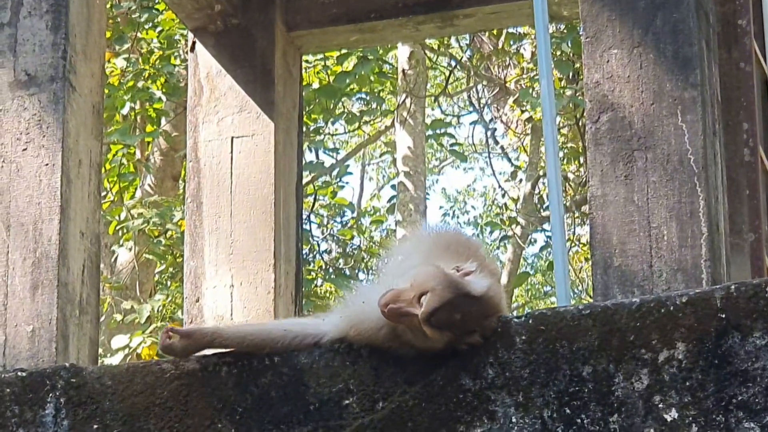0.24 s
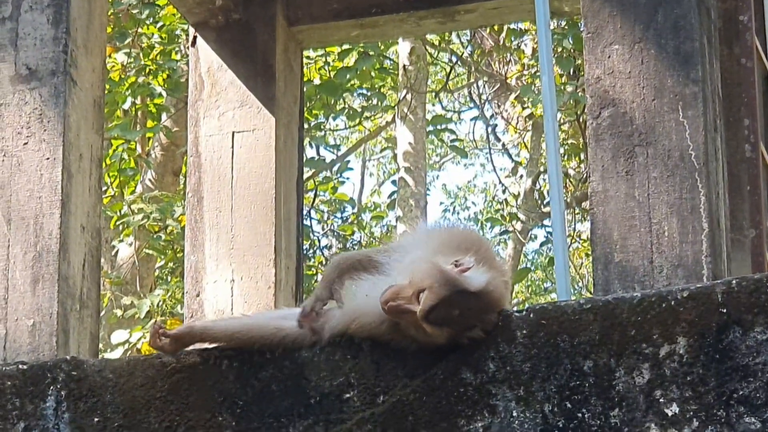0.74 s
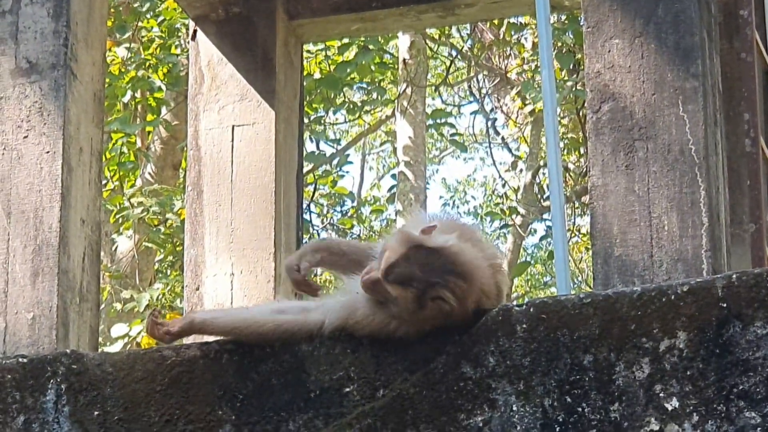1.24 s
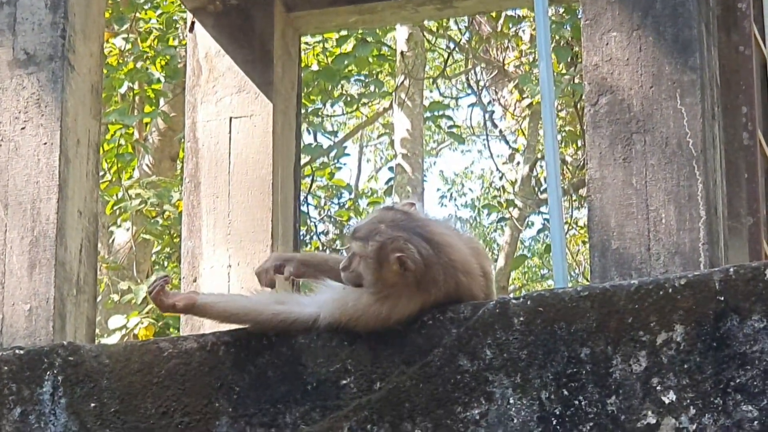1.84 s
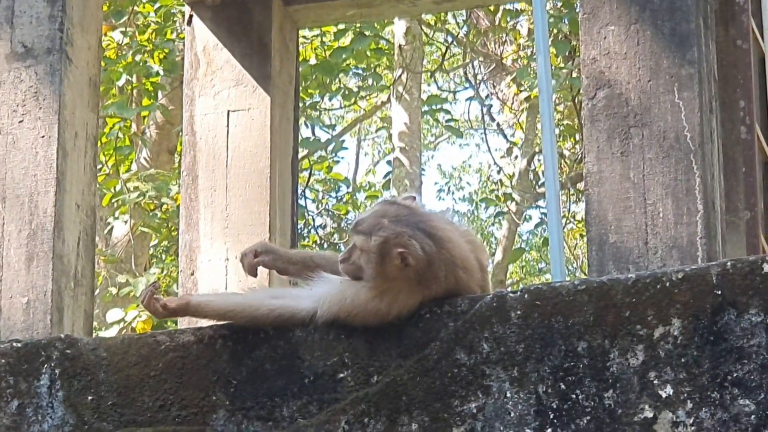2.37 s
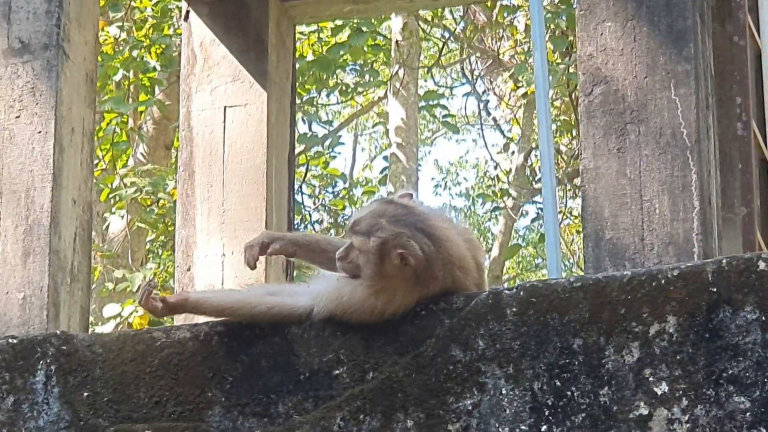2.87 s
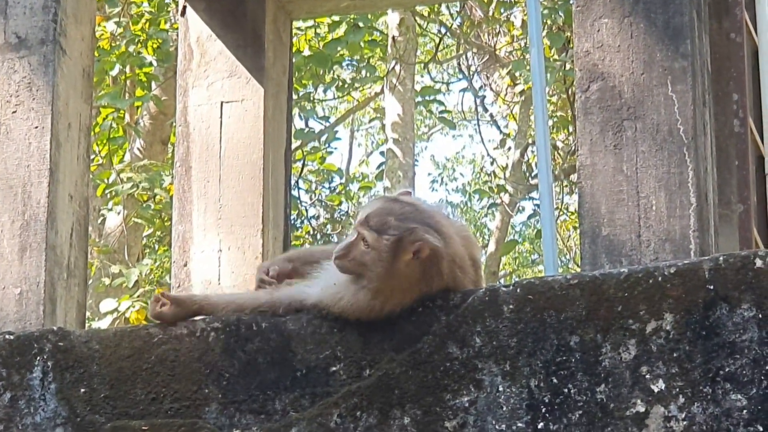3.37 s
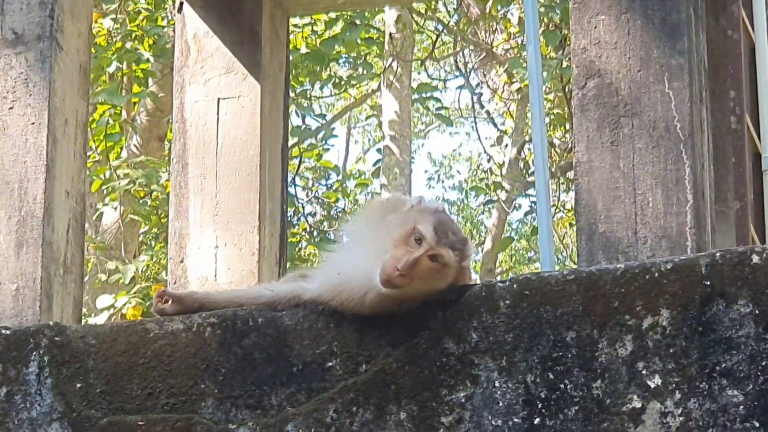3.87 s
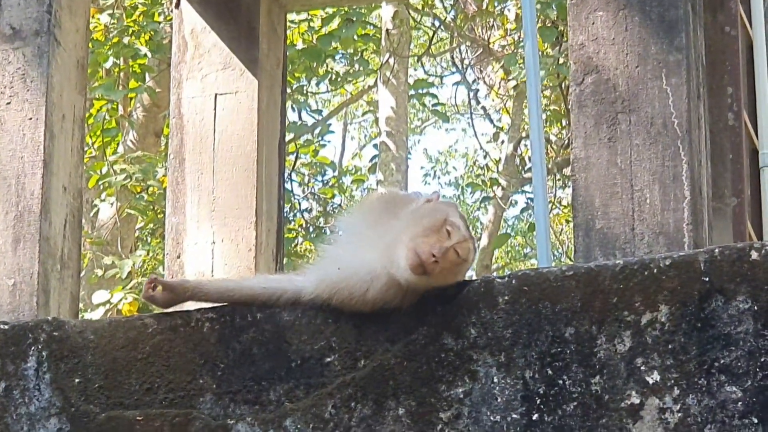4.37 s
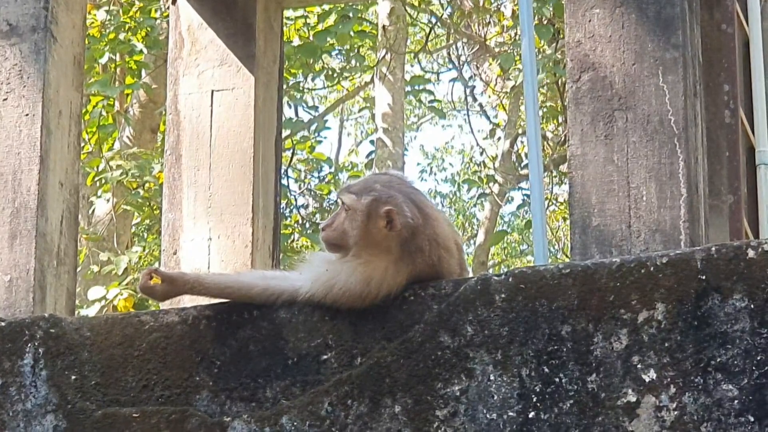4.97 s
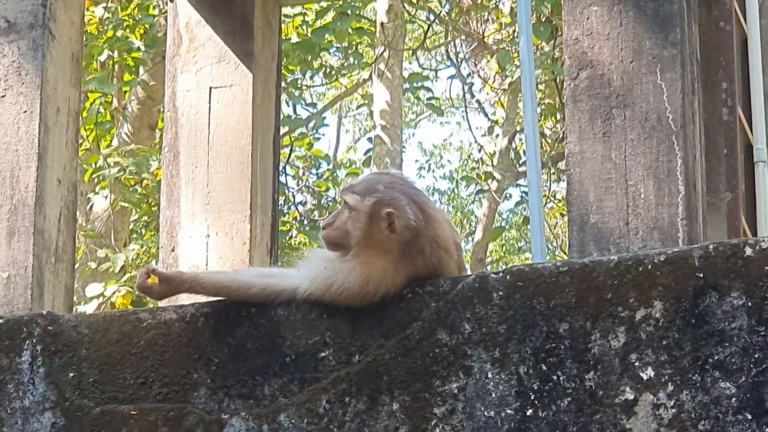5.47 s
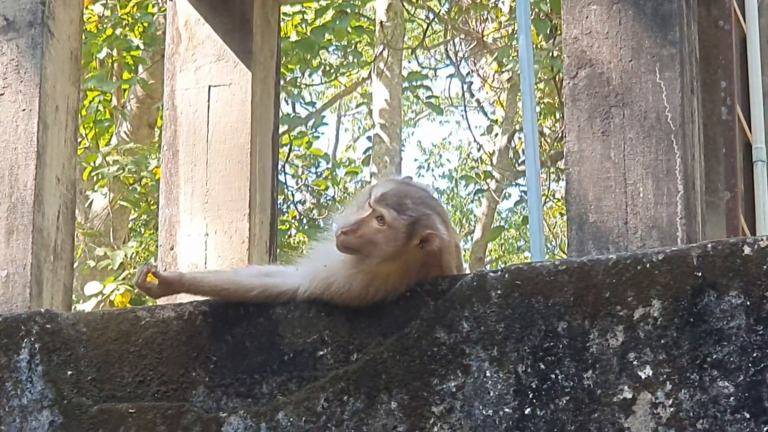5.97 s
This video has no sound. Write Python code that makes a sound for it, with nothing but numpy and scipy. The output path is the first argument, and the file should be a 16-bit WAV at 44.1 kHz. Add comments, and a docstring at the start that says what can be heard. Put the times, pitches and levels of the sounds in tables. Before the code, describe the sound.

One bird repeats a sharp falling chip while others whistle and call among echoing trees, above a low far-off rumble.

```python
"""Birds around a forest shelter

Small birds call from the trees over a low, far-off rumble and a faint hiss of insects.
One repeats a falling chip, broken up by reflections off the open shelter's posts and beams;
others whistle, slur, twitter, hoot and give nasal notes, mostly as gliding, trembling tones.
Trunks and leaves scatter the calls into a long tail."""
import sys
import numpy as np
from scipy import signal
from scipy.fft import rfft, irfft
from scipy.io import wavfile
from scipy.ndimage import uniform_filter1d

SR = 44100
rng = np.random.default_rng(int(sys.argv[2]) if len(sys.argv) > 2 else 0)


def pcm_store(signal):
    """Save signal as 16-bit PCM."""
    levels = np.round(np.clip(np.atleast_2d(signal), -1, 1) * 32767)
    wavfile.write(sys.argv[1], SR, levels.astype(np.int16).T)


N = 273861
TIME = np.arange(N) / SR


def amp(db):
    """Decibels to gain."""
    return 10 ** (np.asarray(db) / 20)


def unit(x):
    """Scales to an rms of one."""
    return x / np.sqrt(np.mean(x ** 2) + 1e-20)


def read(points, hz):
    """A table's value at hz, on a log-frequency axis."""
    freq_hz, value = np.transpose(points)
    return np.interp(np.log(hz + 1), np.log(freq_hz), value)


def add(mix, start_s, sound):
    """Mixes a sound in at start_s."""
    part = mix[..., max(round(start_s * SR), 0):][..., :sound.shape[-1]]
    part += sound[..., :part.shape[-1]]


def wander(rate_hz):
    """A smooth random curve of unit size."""
    hz = np.fft.rfftfreq(N, 1 / SR)
    return unit(irfft(rfft(rng.standard_normal(N)) * np.exp(-(hz / rate_hz) ** 2), N))


# Stereo width of the noise beds: freq_hz, left_right_correlation
BED_WIDTH = [(60, 0.98), (130, 0.95), (300, 0.79), (600, 0.43), (1200, 0), (2600, 0.29), (5000, 0),
             (15000, 0.042)]
# Their lean to one side: freq_hz, left_minus_right_db
BED_BALANCE = [(60, 0), (110, -2), (200, 0.5), (380, -2), (700, -1), (1290, -2.0), (2380, -3), (4400, 2.5),
               (8120, 2.5), (15000, 1.5)]

def noise(shape, patchy_db):
    """Diffuse stereo noise with the spectrum shape(hz), drifting in patches; the bass is near mono."""
    hz = np.fft.rfftfreq(4096, 1 / SR)
    a, b, c, d, patches = rng.standard_normal((5, len(hz), N // 1024 + 3))
    patches = unit(uniform_filter1d(uniform_filter1d(patches, size=30, axis=0), size=5, axis=1))
    alike = np.clip(read(BED_WIDTH, hz), -1, 1)[:, None]
    left = a + 1j * b
    right = alike * left + np.sqrt(1 - alike ** 2) * (c + 1j * d)
    spectra = np.array([left, right]) * shape(hz)[:, None] * amp(patchy_db * patches)
    spectra *= amp(np.outer([.5, -.5], read(BED_BALANCE, hz)))[:, :, None]
    return unit(signal.istft(spectra, nperseg=4096, noverlap=3072)[1][:, :N])


def band(centre_hz, width_hz):
    """A bell-shaped spectrum."""
    return lambda hz: np.exp(-((hz - centre_hz) / width_hz) ** 2)


# Tone of the low roar: freq_hz, gain_db
ROAR_EQ = [(18, -34), (29, -47), (42, 0), (58, 0.5), (68, -6), (88, 1.5), (102, -7.5), (130, -10),
           (160, -17), (230, -21.5), (400, -23.5), (650, -26), (1100, -33), (1800, -42)]
# Swells on top of the steady drone: peak_s, half_width_s, level_db
SWELLS = [(.72, 0.41, -45), (1.29, 0.16, -34.5), (2.1, 0.16, -38.5), (3.59, 0.031, -36.5),
          (4.32, 0.029, -42), (6.14, 0.048, -42)]

def rumble(roar_db=-39, drone_db=-48.5, drone_hz=78, drift_hz=3):
    """Low roar, perhaps of distant traffic, with one wavering engine-like drone."""
    roar = noise(lambda hz: amp(read(ROAR_EQ, hz)) / (1 + (hz / 2200) ** 4), patchy_db=1.5)
    drone = np.sqrt(2) * np.sin(2 * np.pi * np.cumsum(drone_hz + drift_hz * wander(7.64)) / SR)
    swells = sum(amp(db) * np.exp(-((TIME - s) / width) ** 2) for s, width, db in SWELLS)
    return amp(roar_db) * roar + (amp(drone_db) + swells) * drone


# Tone of the forest bed: freq_hz, gain_db
AIR_EQ = [(590, -47), (1000, -7.5), (1150, -0.5), (1250, -4.5), (1680, -4), (2020, -2), (2640, -5),
          (2730, -5.5), (2860, -8), (3070, -6.5), (4190, -13.5), (5040, -13.5), (6490, -10), (9840, -32),
          (15800, -23)]

def forest_air(level_db=-53.7):
    """The soft hiss of the far forest."""
    return amp(level_db) * noise(lambda hz: amp(read(AIR_EQ, hz)), patchy_db=2.22)


# Bouts of insect hiss: start_s, length_s, level_db
INSECT_CUES = [(1.33, 2.08, -60.5), (3.975, 2.02, -59)]

def insects():
    """Insects hiss in a high, patchy band that fades in and out."""
    bouts = np.zeros(N)
    for s, length, db in INSECT_CUES:
        add(bouts, s, amp(db) * signal.windows.tukey(int(length * SR), .5))
    return bouts * noise(band(centre_hz=5700, width_hz=1800), patchy_db=5.5)


# Soft rustles and thin hisses: start_s, length_s, level_db, centre_hz, width_hz
RUSTLE_CUES = [(0, 0.087, -50.5, 2550, 1290), (2.08, 0.67, -52, 323, 200), (4.248, 0.86, -56.5, 274, 180),
               (4.45, 0.083, -53, 6100, 1600), (5.045, 0.22, -66.5, 10900, 1400)]

def rustles():
    """Bands of noise that each swell once and die away."""
    out = np.zeros((2, N))
    for s, length, db, centre_hz, width_hz in RUSTLE_CUES:
        swell = np.zeros(N)
        add(swell, s, np.sin(np.linspace(0, np.pi, int(length * SR))))
        out += amp(db) * swell * noise(band(centre_hz, width_hz), patchy_db=0)
    return out


def forest_echo(x, t60_s, early_t60_s=0.15, early_db=4, rise_s=0.015):
    """Early echoes off near trunks, then a long, smooth scatter from the trees."""
    t = np.arange(2 * SR) / SR
    taps = rng.choice([-1., 1.], (2, len(t))) * (rng.random((2, len(t))) < .05)
    decay = amp(-60 * t / t60_s) + amp(early_db - 60 * t / early_t60_s)
    tail = taps * decay * (1 - np.exp(-t / rise_s))
    tail /= np.linalg.norm(tail, axis=1, keepdims=True)
    return signal.fftconvolve(x[None], tail, axes=1)[:, :N]


def shelter(x, count=22, reach_s=.024, reflections_db=1):
    """Posts, beams and floor add a handful of reflections that break up a sweep."""
    taps = np.zeros((2, int(reach_s * SR) + 1))
    for ear, (lateness, sign) in zip(taps, rng.random((2, 2, count))):
        delay_s = (.1 + .9 * lateness) * reach_s
        ear[(delay_s * SR).astype(int)] = np.sign(sign - .5) * np.exp(-lateness)
    taps *= amp(reflections_db) / np.linalg.norm(taps[0])
    taps[:, 0] = 1  # the direct path
    return signal.fftconvolve(x, taps / np.linalg.norm(taps[0]), axes=1)


def leaves(x, edge_hz=8800):
    """Foliage and air soak up the highest overtones."""
    hz = np.fft.rfftfreq(2 * N, 1 / SR)
    return irfft(rfft(x, 2 * N) / (1 + (hz / edge_hz) ** 10))[:, :N]


def place(x, side, lag_s=0.00012, shade_db=4):
    """A source reaches the nearer ear earlier and louder (side: +1 left, -1 right)."""
    ear = np.array([[.5], [-.5]]) * side
    lead = np.exp(2j * np.pi * np.fft.rfftfreq(len(x), 1 / SR) * lag_s * ear)
    return irfft(rfft(x) * lead, len(x)) * amp(shade_db * ear)


def hoots(start_s=.52, every_s=0.11, length_s=0.078, pitch_hz=1060, peak_db=-57, count=6):
    """A very distant bird gives an even run of soft hoots."""
    out, t = np.zeros(N), np.arange(int(length_s * SR)) / SR
    hoot = amp(peak_db) * np.sin(2 * np.pi * pitch_hz * t) * np.hanning(len(t))
    for k in range(count):
        add(out, start_s + k * every_s, hoot)
    return out


def note(length_s, pitches_hz, rough, tremor, waver=0.0777, flutter=0.091):
    """Phase and envelope of one note: the pitch curves through three points and trembles."""
    progress = np.linspace(0, 1, int(length_s * SR))
    n = len(progress)
    contour_hz = np.polyval(np.polyfit([0, .5, 1], pitches_hz, 2), progress)
    hz = contour_hz * (1 + waver * rough * tremor[:n])
    swell = signal.windows.tukey(n, .5) * np.exp(flutter * rough * tremor[::-1][:n])
    return 2 * np.pi * np.cumsum(hz) / SR, np.sqrt(2) * swell


# Nasal calls: start_s, length_s, level_db, first_hz, middle_hz, last_hz
NASAL_CUES = [(2.055, 0.11, -62.5, 1867, 1904, 1880), (2.476, 0.097, -51.5, 1860, 1880, 1924),
              (2.65, 0.16, -54.5, 1807, 1887, 1930), (3.83, .1, -57, 1700, 1730, 1740),
              (3.91, .135, -50, 1735, 1745, 1748), (4.359, 0.075, -58.5, 1640, 1660, 1640),
              (4.581, 0.077, -53.5, 1720, 1680, 1580)]
# Their timbre: harmonic_number, gain_db
NASAL_HARMONICS = [(1, 1.5), (2, -5), (3, -11), (4, -16)]

def nasals(rough=0.13):
    """A bird gives short, nearly level notes with a stack of overtones."""
    out, tremor = np.zeros(N), wander(250)
    for s, length, db, *pitches in NASAL_CUES:
        phase, swell = note(length, pitches, rough, np.roll(tremor, -int(s * SR)))
        voice = sum(amp(gain_db) * np.sin(k * phase) for k, gain_db in NASAL_HARMONICS)
        add(out, s, amp(db) * swell * voice)
    return out


def overtones(phase, step_db, count=3):
    """The octave and the harmonics above it, each weaker than the last."""
    return sum(amp(k * step_db) * np.sin((k + 2) * phase) for k in range(count))


def notes(rows):
    """A run of near-pure notes, each a trembling sine with two weaker overtones."""
    out, tremor = np.zeros(N), wander(328)
    for s, length, db, pitches, rough, octave_db in rows:
        phase, swell = note(length, pitches, rough, np.roll(tremor, -int(s * SR)))
        voice = np.sin(phase) + amp(octave_db) * overtones(phase, step_db=-5, count=2)
        add(out, s, amp(db) * swell * voice)
    return out


def arch(hz, glide_hz, droop=0.0125):
    """First, middle and last pitch of a glide whose ends sag slightly."""
    return [hz * (1 - droop) - glide_hz / 2, hz, hz * (1 - droop) + glide_hz / 2]


# Soft pips: start_s, length_s, level_db, pitch_hz
PIP_CUES = [(0, 0.17, -58.5, 3650), (.222, .39, -57, 2835), (2.132, 0.04, -45.5, 2560),
            (2.562, 0.089, -43, 2605), (3.584, 0.066, -51.5, 3350), (4.134, 0.17, -56, 2330)]

def pips(rough=0.22, octave_db=-22):
    """A bird pips softly, each note on a nearly level pitch."""
    return notes((s, length, db, arch(hz, 0), rough, octave_db) for s, length, db, hz in PIP_CUES)


# Thin high tones: start_s, length_s, level_db, pitch_hz, glide_hz, roughness
HIGH_TONE_CUES = [(1.349, .14, -54.5, 6070, 696, 1.18), (1.648, 0.13, -52.5, 6090, -720, .5),
                  (2.055, 0.095, -51, 5800, 44, 0.29), (2.155, 0.095, -51.5, 5520, -48, 0.04),
                  (2.367, 0.079, -48, 6380, 202, 0.23), (2.493, 0.082, -51, 5740, 300, 0.16),
                  (2.56, 0.1, -55, 5110, 190, 0.28), (4.583, 0.071, -53.5, 5020, -100, .15),
                  (5.379, 0.082, -50, 5640, 1105, 0.33), (5.438, .07, -47.5, 5930, 94, .12)]

def high_tones(octave_db=-32):
    """Thin high tones: twitters, and the bright upper overtones of the nasal calls."""
    return notes((s, length, db, arch(hz, glide), rough, octave_db)
                 for s, length, db, hz, glide, rough in HIGH_TONE_CUES)


# Upward slurs: start_s, level_db
UPSLUR_CUES = [(2.701, -34.5), (4.036, -44), (5.418, -36)]

def upslurs(length_s=.085, pitches_hz=(2532, 3018, 3354), rough=0.44, octave_db=-22):
    """A bird sweeps quickly upward; a fast tremble makes it hoarse."""
    return notes((s, length_s, db, pitches_hz, rough, octave_db) for s, db in UPSLUR_CUES)


# Descending song: start_s, length_s, level_db, pitch_hz, glide_hz, roughness, octave_db
PHRASE_CUES = [(5.043, 0.09, -54, 3076, -84, .08, -23), (5.13, 0.07, -33, 2911, -85, 0.07, -48),
               (5.212, .108, -38.5, 2510, -390, 0.47, -50), (5.408, .15, -45.5, 2114, -2, 0.18, -9),
               (5.608, 0.1124, -42, 2056, -130, 0.09, -15.5), (5.73, 0.14, -58, 1983, 5, 0.27, -28)]

def phrase():
    """A bird steps down through a phrase of separate notes."""
    return notes((s, length, db, arch(hz, glide), rough, octave_db)
                 for s, length, db, hz, glide, rough, octave_db in PHRASE_CUES)


def slide(curve, step_db, rough, waver=.0737, flutter=0.22, edge_s=0.0088):
    """One long whistle that follows its pitch and level curves, trembling a little."""
    when, pitch, db, octave_db = np.transpose(curve)
    hz = np.interp(TIME, when, pitch) * (1 + waver * rough * wander(298))
    phase = 2 * np.pi * np.cumsum(hz) / SR
    gate = np.clip(np.minimum(TIME - when[0], when[-1] - TIME) / edge_s, 0, 1)
    tremble = np.exp(flutter * rough * wander(300))
    tone = amp(np.interp(TIME, when, db)) * np.sin(phase)
    upper = amp(np.interp(TIME, when, octave_db)) * overtones(phase, step_db)
    return np.sqrt(2) * gate * tremble * (tone + upper)


# Path of the rising whistle: time_s, pitch_hz, level_db, octave_level_db
RISE_CURVE = [(.44, 2380, -52, -58), (.57, 2420, -47.5, -50.5), (.62, 2647, -44.5, -61),
              (.685, 2857, -41, -53), (.765, 2853, -39, -64), (.8, 2920, -50, -73), (1.03, 2880, -47, -78)]

def rising_whistle():
    """A bird slides up in one clean whistle and holds the top."""
    return slide(RISE_CURVE, step_db=-8.5, rough=0.075)


# Path of the falling whistle: time_s, pitch_hz, level_db, octave_level_db
FALL_CURVE = [(3.95, 4860, -55.5, -88), (4.2, 4600, -49, -76), (4.25, 4160, -48.5, -62),
              (4.35, 4060, -37.5, -64), (4.41, 3510, -49, -73), (4.465, 3043, -34, -69),
              (4.55, 2874, -33.5, -62), (4.6, 2960, -45.5, -86), (4.71, 2910, -42.5, -90)]

def falling_whistle():
    """A bird slides down in one slightly rough whistle."""
    return slide(FALL_CURVE, step_db=-10, rough=.24)


def whistlers():
    """Six layers of birdsong: returns their direct sound, dimmed by leaves, and a mono echo send."""
    direct, send = np.zeros((2, N)), np.zeros(N)
    for layer, direct_db, side in [(rising_whistle, -6, .49), (falling_whistle, -7, .47),
                                   (phrase, -1, -.36), (upslurs, -8, .74),
                                   (pips, -4, .1), (high_tones, -3, .26)]:
        song = layer()
        direct += amp(direct_db) * place(song, side)
        send += song
    return direct, send


# The lead bird's chips: mid_fall_s, level_db, first_hz, last_hz, high_start_gain_db
CHIP_CUES = [(0.365, -32, 4800, 2060, -10), (.975, -35, 4300, 2304, -1), (1.567, -34.5, 5200, 2240, -1),
             (2.2, -34.5, 3785, 1920, -1.5), (2.746, -32, 3290, 2300, -11), (3.284, -34.5, 3917, 2220, 2),
             (3.837, -34.5, 4200, 2030, -3), (4.354, -34.5, 3380, 1970, 7), (4.865, -31, 4316, 2235, -7)]
# Strength of its voice along the sweep: pitch_hz, gain_db
CHIP_EQ = [(1950, -16), (2300, -9.5), (2550, -7), (2780, -1), (2980, -3.5), (3200, -10), (3600, -9.5),
           (4200, -15), (5200, -14.5)]

def chips(mid_hz=2770, floor_hz=1866, fall_s=.027, hold_s=.0086, side=-.39, flutter=.42, waver=.0256):
    """A trembling tone holds, drops fast and levels out; returns the near sound and an echo send."""
    near, send = np.zeros((2, N)), np.zeros(N)
    t = np.arange(-.06, .08, 1 / SR)  # zero where the fall passes mid_hz
    fall_hz = floor_hz + (mid_hz - floor_hz) * np.exp(-t / fall_s)
    tremor, quaver = wander(260), wander(328)
    for s, db, first_hz, last_hz, high_start_db in CHIP_CUES:
        now = slice(int(s * SR), int(s * SR) + len(t))
        hz = np.minimum(fall_hz, first_hz)
        tone = np.sqrt(2) * np.sin(2 * np.pi * np.cumsum(hz * (1 + waver * quaver[now])) / SR)
        drop_s = t[np.argmax(fall_hz < first_hz)]
        gate = uniform_filter1d(1. * ((t > drop_s - hold_s) & (hz > last_hz)), size=130)
        level_db = db + read(CHIP_EQ, hz) + np.interp(hz, [mid_hz, 3500], [0, high_start_db])
        chip = amp(level_db) * tone * gate * np.exp(flutter * tremor[now])
        add(send, s + t[0], chip)
        add(near, s + t[0], shelter(place(chip, side)))
    return near, send


def scene(chip_db=-3, nasal_db=-2, chip_wet_db=0.23, whistle_wet_db=-2, nasal_wet_db=-5):
    """The birds all around, with their echoes, over the background."""
    chip_near, chip_send = chips()
    whistle_direct, whistle_send = whistlers()
    nasal = nasals()
    birds = amp(chip_db) * chip_near + whistle_direct + amp(nasal_db) * nasal + hoots()
    chorus_send = amp(whistle_wet_db) * whistle_send + amp(nasal_wet_db) * nasal
    echoes = forest_echo(amp(chip_wet_db) * chip_send, t60_s=1.53) + forest_echo(chorus_send, t60_s=1.35)
    return leaves(birds + echoes) + rumble() + forest_air() + insects() + rustles()


def record(dry, cutoff_hz=15800):
    """A steep high cut, with the briefest fade at either end."""
    faded = dry * signal.windows.tukey(N, .001)
    lowpass = signal.firwin(511, cutoff_hz, window=("kaiser", 9), fs=SR)
    return signal.oaconvolve(faded, lowpass[None], "same")


dry = scene()
out = record(dry)
pcm_store(out)
```